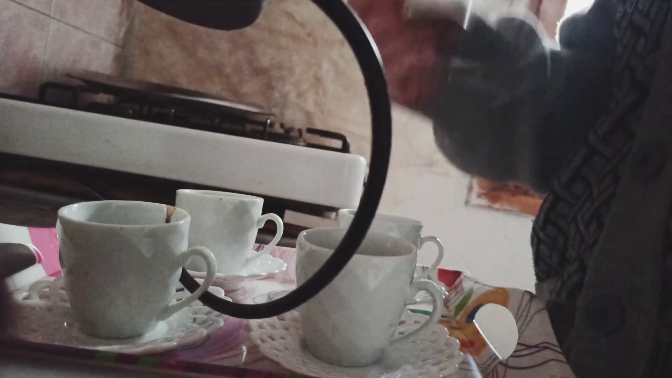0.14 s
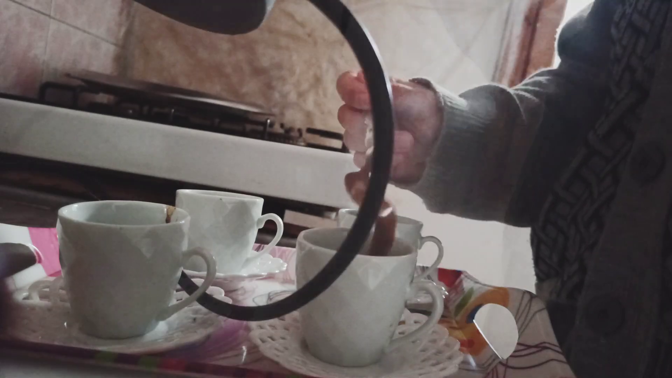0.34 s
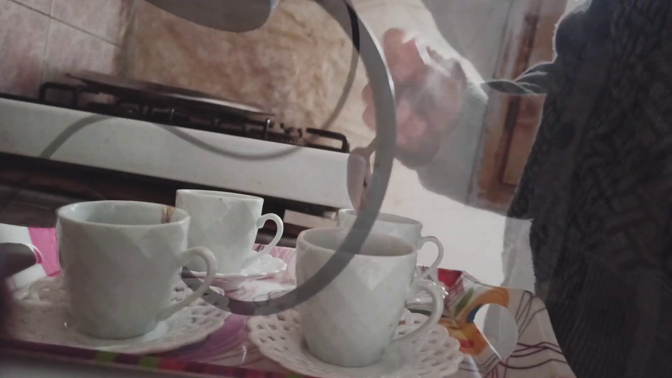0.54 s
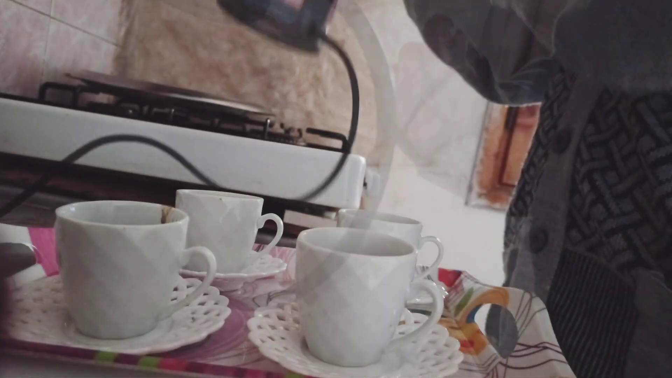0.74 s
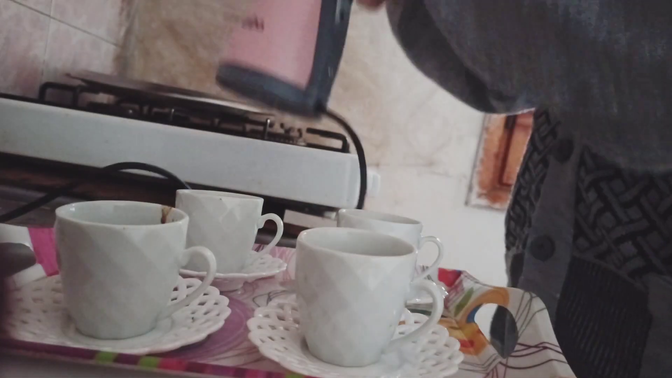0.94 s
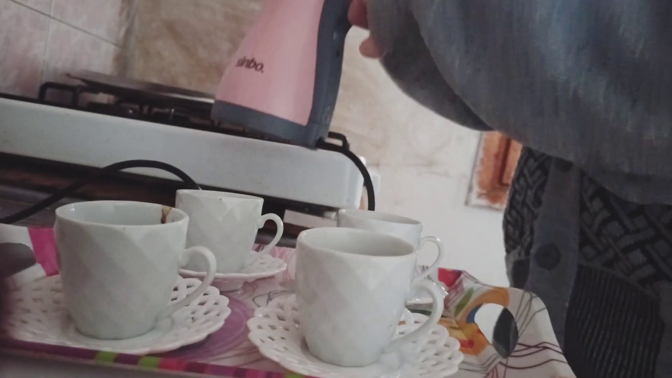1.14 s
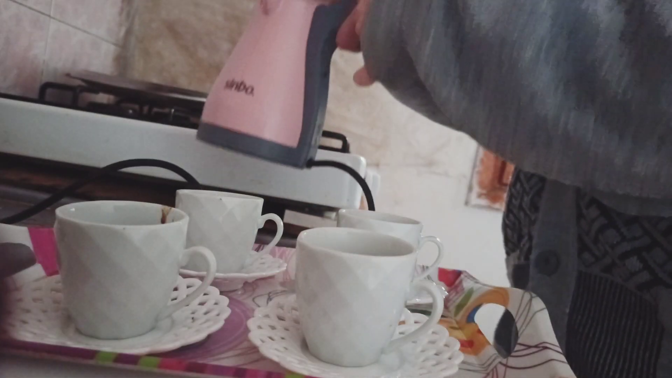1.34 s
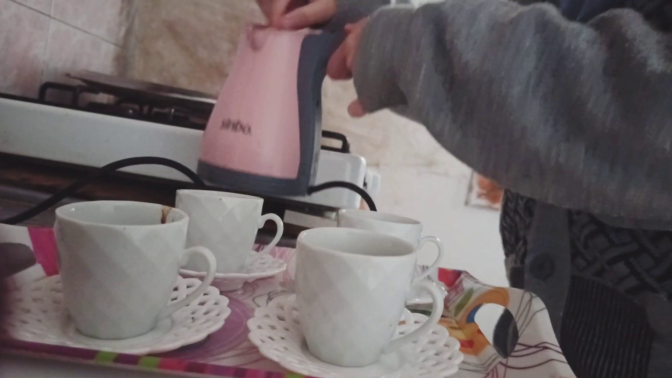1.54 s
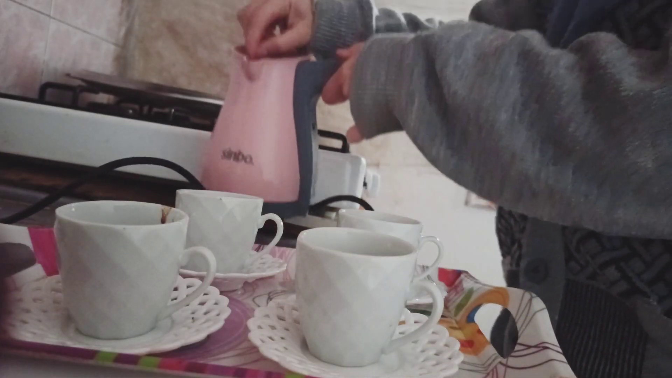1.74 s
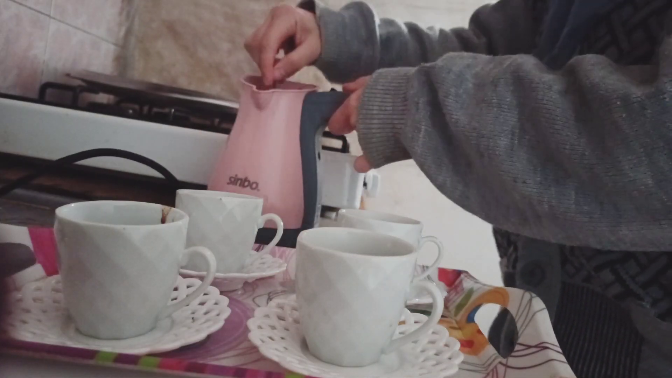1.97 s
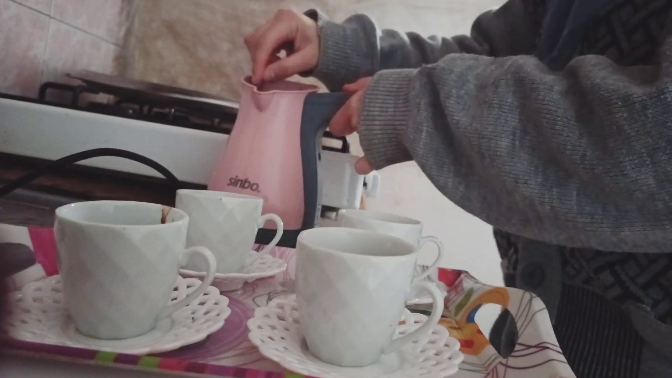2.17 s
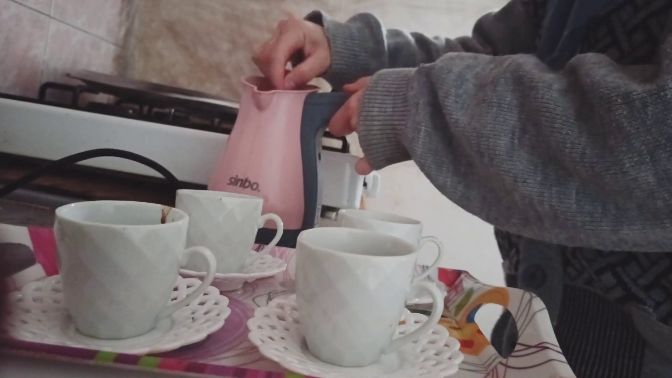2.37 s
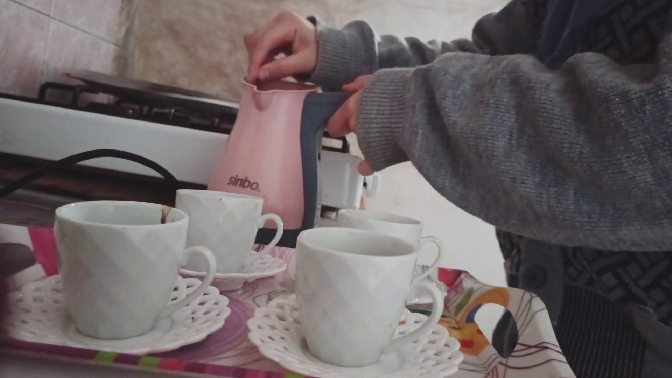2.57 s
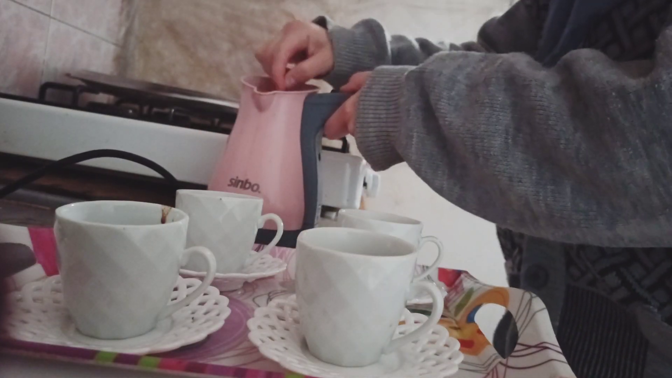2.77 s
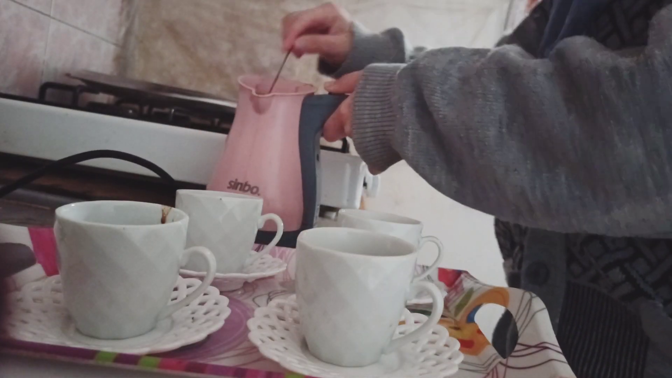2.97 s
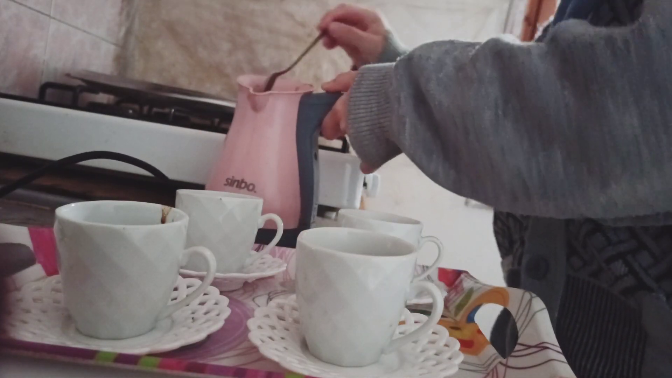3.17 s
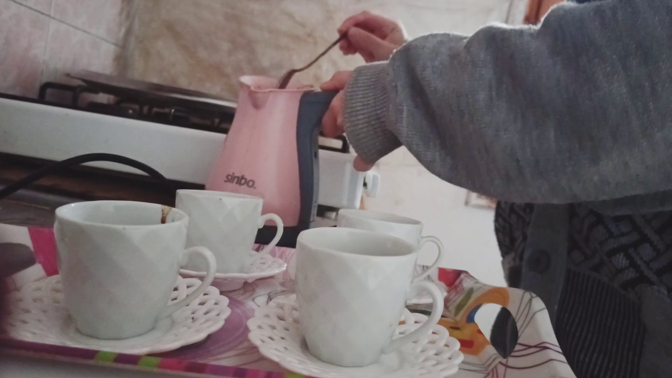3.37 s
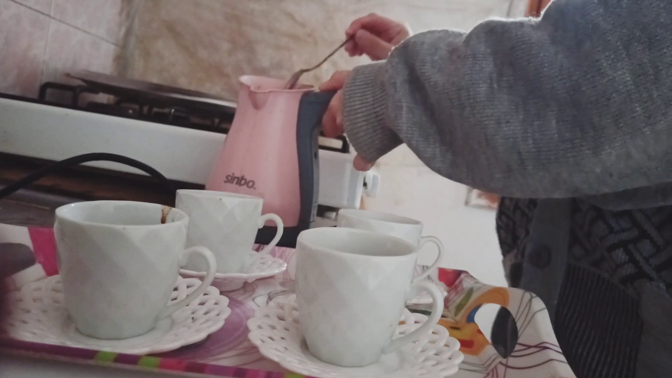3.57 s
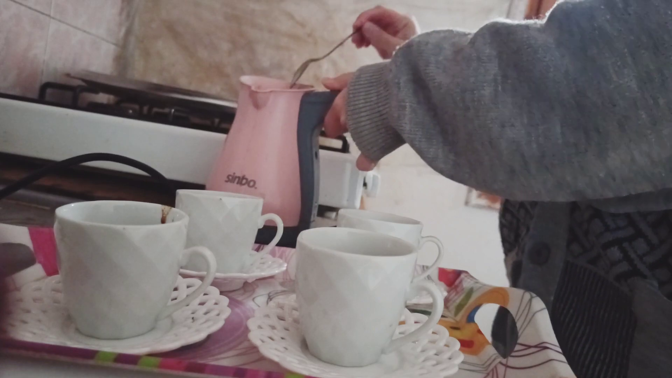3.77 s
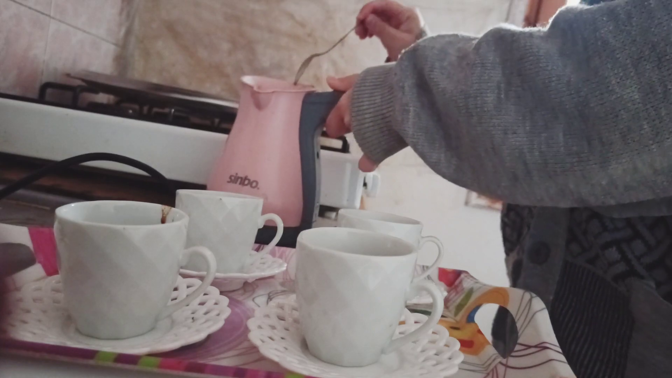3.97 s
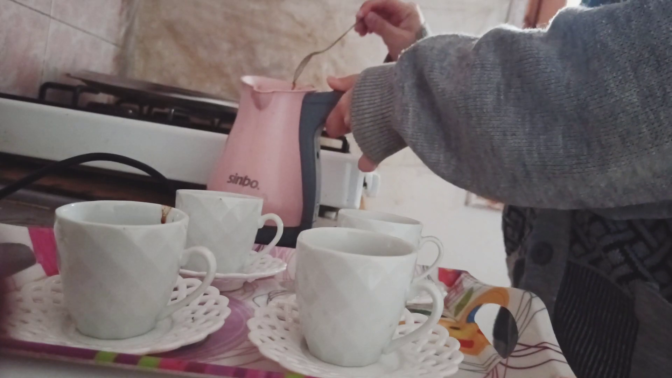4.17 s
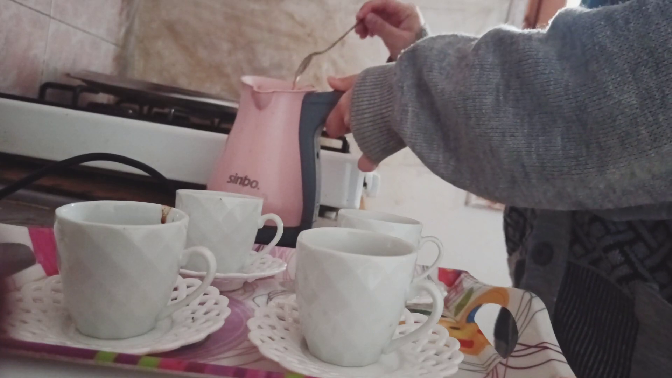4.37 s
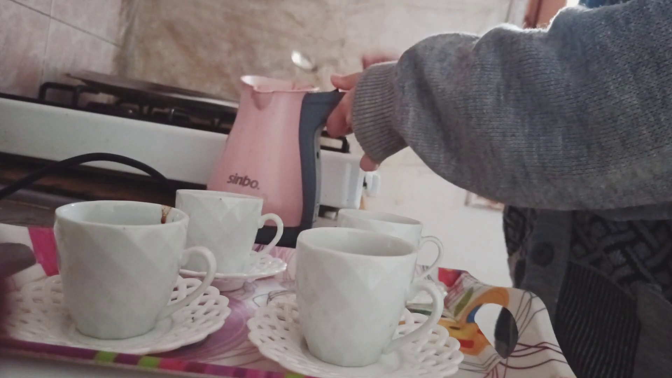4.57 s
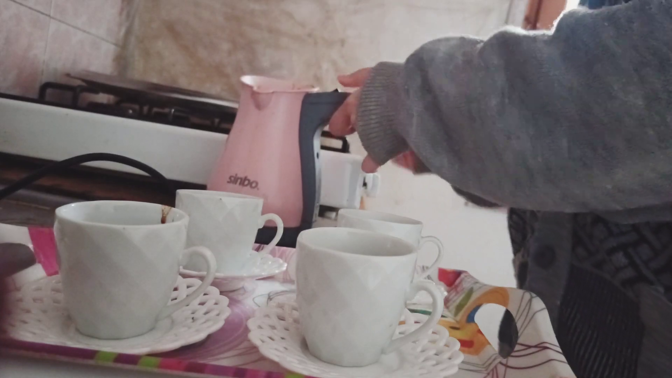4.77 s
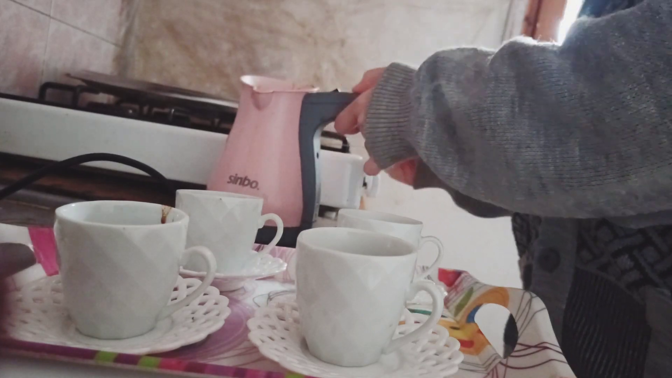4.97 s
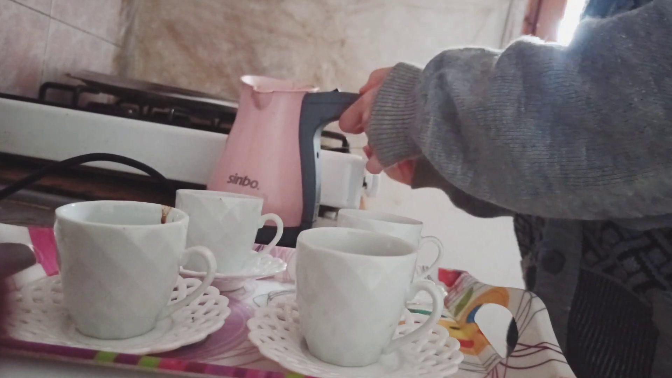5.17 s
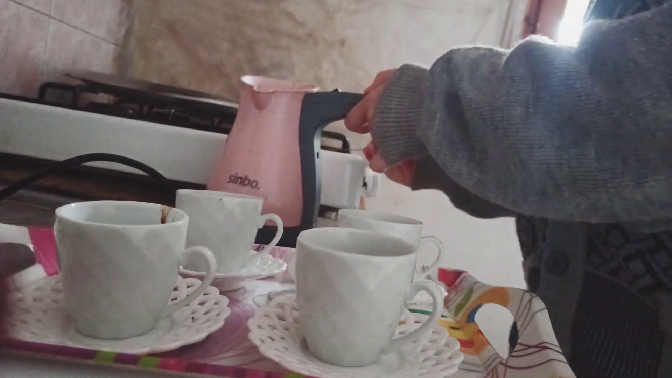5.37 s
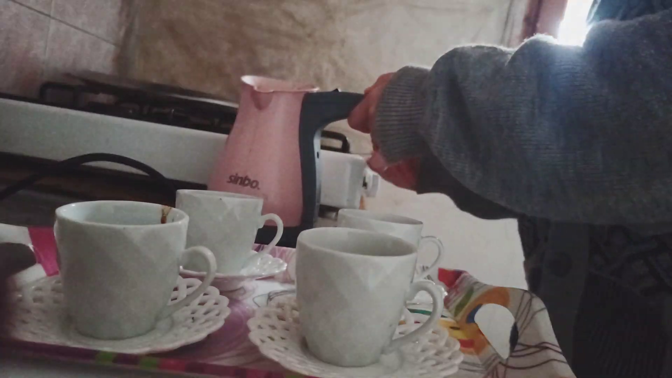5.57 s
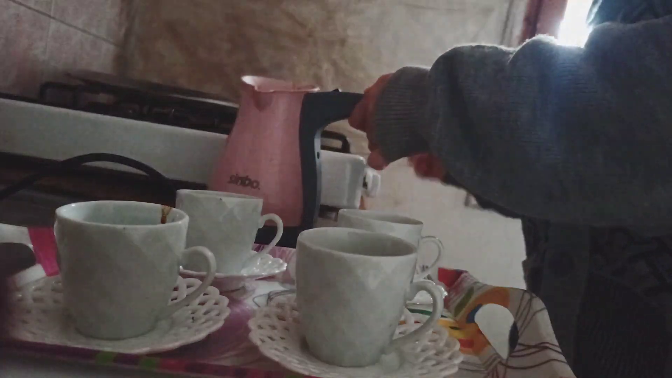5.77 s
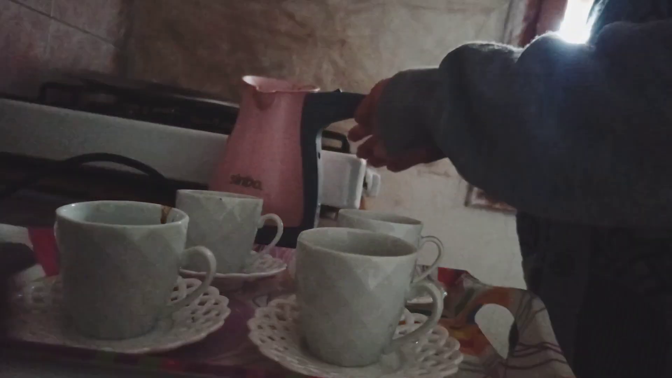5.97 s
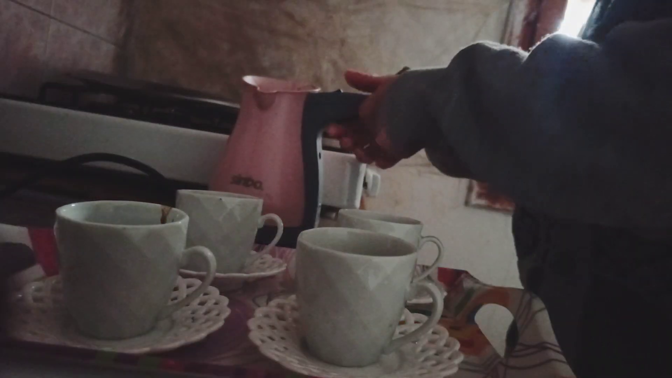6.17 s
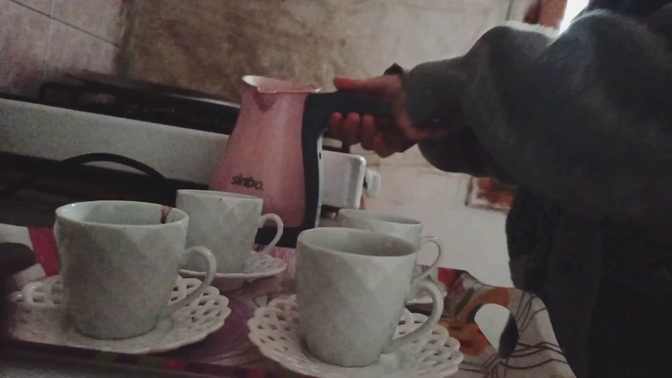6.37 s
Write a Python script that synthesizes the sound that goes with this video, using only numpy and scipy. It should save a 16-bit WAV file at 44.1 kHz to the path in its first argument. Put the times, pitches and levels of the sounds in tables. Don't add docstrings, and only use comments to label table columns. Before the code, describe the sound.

A spoon taps and stirs in a plastic coffee pot, which thuds down on the counter; later shelf knocks and a brief cutlery scrape.

```python
import sys
import numpy as np
from scipy import signal
from scipy.fft import rfft, irfft, next_fast_len
from scipy.io import wavfile
from scipy.ndimage import uniform_filter1d

SR = 44100
rng = np.random.default_rng(int(sys.argv[2]) if len(sys.argv) > 2 else 0)


def linear_from_db(decibels):
    return 10 ** (np.asarray(decibels, float) / 20)


def materialize(psi):
    bounded = np.clip(np.atleast_2d(psi).T, -1, 1)
    quanta = np.round(bounded * 32767).astype(np.int16)
    wavfile.write(sys.argv[1], SR, quanta)


N = 283122
TIME_S = np.arange(N) / SR
BINS_HZ = np.arange(257) * SR / 512

# start_s [s], peak_db [dB], thud_db [dB], clack_db near 1.7 kHz [dB], hardness_db [dB]
SPOON_BLOWS = [(0.4, -51.5, -13, 4, 15), (0.967, -38.5, 11, -4, -11), (1.113, -24.5, 1, -1.5, 7),
               (1.124, -31, 9, -4, -9), (1.409, -19.5, -8, -9.5, -2), (1.58, -15, -15, -5.5, -1.5),
               (1.812, -34.5, -3.5, 0, 0.5), (1.902, -39.5, 16.5, -2, 23), (2.111, -31, -14, -3, -10.5),
               (2.295, -21.5, 2, 0.5, 1), (2.417, -19, 6.5, 8, 17), (2.47, -33.5, -9, -6.5, 0),
               (2.699, -42.5, 1.5, -1, -4), (2.719, -38, 13, 12.5, 3.5), (2.8, -41, 6, -6.5, -7),
               (2.864, -40, -11, -8, -3), (3.328, -33.5, 2, 7, 6), (3.479, -30.5, 12, 20, 39.5),
               (3.573, -34.5, 18, -0.5, -9), (3.708, -44, 9, -5, -8.5), (3.349, -40, 9, -1, -5)]
SET_DOWN_BLOWS = [
    (1.951, 0, -1.5, 1.5, 6),
    (1.972, -14, -1.5, -3.5, -7.5),
    (1.996, -13.5, 14.5, -12.5, -4),
]
KNOCK_BLOWS = [
    (5.16, -19, -2.5, 3.5, 9.5),
    (5.209, -33, -7.5, -10, -3),
    (5.391, -15.5, 3.5, 1, -0.5),
    (5.444, -26.5, 8, -1, -6),
]
# pitch_hz [Hz], level_db [dB], t60_s [s]
POT_MODES = [(430, -14, 0.017), (533.2, 9, 0.027), (668, 8.5, 0.016), (879, 5.5, 0.049),
             (1211, -17.5, 0.058), (1506, 3, 0.06), (1670, -15.5, .06), (2170, -12.5, 0.12),
             (2290, -17.5, 0.15), (3400, -17.5, 0.042), (4070, -19.5, .04), (4950, -19, .05),
             (6750, -27, .04), (7610, -22, 0.017)]
COUNTER_MODES = [(118, -4.5, 0.2), (179, -11.5, 0.078), (256, -2, 0.22), (304.8, -1.5, 0.16),
                 (414, -0.5, 0.2), (539, 5, .35), (610, -0.5, .3), (730, -16, .2), (916, -5, .2),
                 (1180, -26.5, .1), (1485, -5, .2), (1730, -7.5, .15), (1990, -15, .2), (3230, -14, .3),
                 (3770, -23.5, .2), (6450, -28.5, .2), (7400, -35.5, .2)]
SHELF_MODES = [(246, -10.5, 0.49), (483, 7, 0.091), (740, 1, 0.12), (812, 7, 0.428), (1390, -5.5, 0.6),
               (1600, -1, 0.37), (2060, -13, 0.6), (2530, -3, 0.24), (2370, -27, 0.45), (3110, -13, 0.07),
               (3250, -9, 0.28), (4400, -19.5, 0.25), (4230, -16, 0.4), (6200, -16, 0.39)]
# start_s [s], peak_db [dB], first_pitch_hz [Hz], t60_s [s]
BUBBLES = [
    (1.642, -22, 559.5, 0.073),
    (1.746, -38, 566, 0.089),
    (1.849, -41.5, 563, .08),
    (3.615, -49.5, 601, 0.1),
    (3.715, -47, 660, 0.095),
]
# peak_s [s], level_db [dB]
AIR_PUFFS = [
    (1.35, -49.5),
    (1.385, -44.5),
    (1.69, -49.5),
    (1.87, -52),
]
# time_s [s], pitch_hz [Hz]
AIR_PITCH = [
    (1.35, 485),
    (1.45, 540),
    (1.72, 620),
]
# pitch_hz [Hz], width_hz [Hz], level_db [dB]
CUTLERY_MODES = [(1763, 29, -1), (1880, 10, -27), (2220, 110, -7.5), (2510, 23, -14), (2920, 23, -5.5),
                 (3540, 18, -7), (4110, 34, 1.5), (4563, 69, -4.5), (4800, 18, -16), (5450, 130, 1),
                 (5230, 74, 3), (5600, 32, -5), (6230, 29, -22), (6370, 24, -9), (6930, 110, -2.5),
                 (7290, 27, 6.5), (7540, 46, 7), (7930, 23, -20), (8300, 24, 6)]
TINE_MODES = [(11700, 33, 0), (12000, 28, -18), (12400, 29, -12), (13300, 28, -20), (14000, 31, -22),
              (14200, 27, -17), (14700, 55, -21)]
# peak_s [s], level_db [dB]
RUSTLES = [
    (2.94, -58),
    (3.55, -66),
    (4.2, -81.5),
    (6.41, -57),
]
# peak_s [s], pitch_hz [Hz], level_db [dB], rise_db_s [dB/s], steadiness [0-1]
SHEET_TONES = [
    (0.01, 865, -65.5, 305, 0.8),
    (3.121, 902, -67, 43, 0.3),
    (5.78, 966, -64.5, 300, 1),
]
# pitch_hz [Hz], level_db [dB per Hz]
HUM_SPECTRUM = [(24, -75.5), (40, -61.5), (86, -13.5), (113, -3.5), (275, -7.5), (301, -0.5), (329, -3.5),
                (452, -2), (580, -11), (853, -10), (1050, -16.5), (4700, -22.5), (5000, -30.5),
                (7340, -26.5), (9000, -42.5), (11700, -84), (19800, -120)]
# time_s [s], level_db [dB]
HUM_SWELL = [(0, -58), (.6, -65.5), (1.3, -59.5), (1.62, -61.5), (2.04, -57.5), (2.3, -58.5), (3.75, -58),
             (4.2, -60), (5.36, -60), (5.6, -52.5), (5.8, -59.5), (6.42, -59.5)]
# pitch_hz [Hz], likeness [0-1]
PORT_LIKENESS = [(60, 0.22), (130, 0.76), (290, 0.9), (640, 0.031), (1400, -0.012), (3000, -0.76),
                 (7000, 0.66)]
# pitch_hz [Hz], t60_s [s]
ROOM_DECAY = [(100, 0.5), (260, 0.44), (700, .36), (1840, 0.3), (4850, 0.24), (9000, 0.19)]
# pitch_hz [Hz], level_db [dB]
MIC_RESPONSE = [(60, -49.5), (100, -12.5), (200, -4.5), (4600, 4.5), (5000, -6.5), (5800, -8), (6300, 0),
                (7600, -7), (8400, -21.5), (11000, -22), (15000, -31)]
# pitch_hz [Hz], difference_db [dB]
LEFT_OVER_RIGHT = [(60, 1.5), (200, 1.5), (600, 6), (2500, 1), (5000, 7.5), (9000, 9), (12000, 0.6)]

EDGE_HZ, AIR_HZ = 8750, 11500
EDGE_SHARE = 0.43
DRAG_S, DRAG_DB, SLIDE_S = 5.592, -38, 0.1
BITE_DB_S, SLIDE_DB_S, LIFT_DB_S = 2501, 40, 220
SHINE_DB, SHINE_RISE_DB_S, SHINE_FALL_DB_S = 8, 1160, 53


def strike(blows, body, ring, clatter_db, clatter_s, contact_s, bounce_s, bounce_db, bounce_over_db):
    out = np.zeros((2, N + SR))
    t = np.arange(8192) / SR
    hz, db, t60 = np.transpose(body)[:, :, None]
    t60 = np.minimum(ring * t60, 28 / hz)
    bounces = [(s + bounce_s, peak_db + bounce_db, *tone)
               for s, peak_db, *tone in blows if peak_db > bounce_over_db]
    for s, peak_db, thud, clack, hard in [*blows, *bounces]:
        weight, detune, phase = rng.standard_normal((3, len(body), 1))
        oscillation = np.sin(2 * np.pi * hz * (1 + 0.01 * detune) * t + 0.8 * phase)
        modes = (linear_from_db(db + 2 * weight) * oscillation * 1000. ** (-t / t60)).sum(0)
        clatter = shape(rng.standard_normal(len(t)), [(hz[0, 0] * 0.6, -30), *zip(hz[:, 0], db[:, 0])])
        clatter = linear_from_db(clatter_db) * unit(clatter) * np.exp(-t / clatter_s)
        sound = modes / np.abs(modes).max() + clatter
        sound *= 1 - np.exp(-t / contact_s)
        edge = clack + EDGE_SHARE * (hard - clack)
        colour = [(300, thud), (800, 0.0062), (1700, clack), (3200, edge),
                  (5500, hard), (8500, hard), (11000, hard - 25)]
        sound = np.roll(shape(np.roll(sound, 400), colour), -400)[:7600]
        sound = heard(linear_from_db(peak_db) * sound / np.abs(sound).max())
        start = int(s * SR)
        out[:, start:start + sound.shape[1]] += sound
    return out[:, :N]


def glugs():
    out = np.zeros(N)
    t = np.arange(8192) / SR
    for s, peak_db, hz, t60 in BUBBLES:
        pitch_hz = hz * (1 + 0.14 * (1 - np.exp(-t / 0.017)))
        envelope = (1 - np.exp(-t / 0.0029)) * 1000. ** (-t / t60)
        bubble = np.sin(2 * np.pi * np.cumsum(pitch_hz) / SR) * envelope
        start = int(s * SR)
        out[start:start + len(t)] += linear_from_db(peak_db) * bubble
    return out


def pot_air():
    pitch_hz = np.interp(TIME_S, *np.transpose(AIR_PITCH))
    level_db = swell(AIR_PUFFS, rise_db_s=450, fall_db_s=330) + 7.0
    return sing(pitch_hz, level_db, width_hz=73.0, steady=0.57)


def drag():
    rare_jerks = 1 + 3 * (rng.standard_normal(N) * 0 + rng.random(N) < 0.02)
    clicks = rng.standard_normal(N) * rare_jerks * linear_from_db(2 * walk(90))
    bite_db = swell([(DRAG_S, DRAG_DB)], BITE_DB_S, SLIDE_DB_S)
    rasp_db = bite_db + np.minimum(0, -LIFT_DB_S * (TIME_S - DRAG_S - SLIDE_S))
    shine_db = swell([(DRAG_S, SHINE_DB)], SHINE_RISE_DB_S, SHINE_FALL_DB_S)
    low = shape(clicks, [(150, -15.5), (300, 4.5), (500, 3), (850, 1.5), (1300, -3.5),
                         (2500, -24.0), (3000, -15), (9000, -85.5)])
    scrape = shape(clicks, [(1800, -24.0), (2500, -11.5), (7500, -7), (9000, 2), (11000, -55)])
    high = linear_from_db(-5.5) * unit(scrape)
    bins_hz = np.arange(N // 2 + 1) * SR / N
    for body, share_db in ((CUTLERY_MODES, -4), (TINE_MODES, -6)):
        modes = sum(linear_from_db(db) / (1 + (2 * (bins_hz - hz) / width) ** 2) for hz, width, db in body)
        high = high + linear_from_db(share_db) * unit(irfft(rfft(clicks) * modes, N))
    return unit(low) * linear_from_db(rasp_db) + high * linear_from_db(rasp_db + shine_db)


def swish():
    grains = rng.standard_normal(N) * linear_from_db(2.0 * walk(27))
    rustle = shape(grains, [(500, -34.0), (1500, 4), (4000, -0.5), (8000, 8.0), (11000, -24)])
    return unit(rustle) * linear_from_db(swell(RUSTLES, rise_db_s=69.5, fall_db_s=61) - 9.5)


def sheet():
    tones = np.zeros(N)
    for s, hz, db, rise_db_s, steady in SHEET_TONES:
        pitch_hz = hz - 45.13 * (TIME_S - s)
        level_db = swell([(s, db)], rise_db_s, fall_db_s=32)
        tones += sing(pitch_hz, level_db, width_hz=25., steady=steady)
    return tones


def sing(hz, db, width_hz, steady):
    carrier = np.exp(2j * np.pi * np.cumsum(hz) / SR)
    jolts = steady + (1 - steady) * (unit(walk(width_hz)) + 1j * unit(walk(width_hz)))
    return np.real(carrier * jolts) * linear_from_db(db + 1.5)


def heard(x):
    t = np.arange(100) * 256 / SR
    t60 = np.interp(BINS_HZ, *np.transpose(ROOM_DECAY))[:, None]
    tail = ports(1000. ** (-t / t60))
    tail += linear_from_db(-19.5) * ports(1000. ** (-t / 0.58) * np.ones((len(BINS_HZ), 1)))
    tail *= 1 - np.exp(-np.arange(tail.shape[1]) / SR / 0.0032)
    tail *= linear_from_db(-4.5) / np.sqrt(np.sum(tail ** 2) / 2)
    tail[[0, 1], [0, 4]] = linear_from_db(-1.0)
    return signal.fftconvolve(x[None], tail, axes=1)


def hum():
    centres_hz = 50 * 2 ** np.arange(0, 8, 0.5)
    swell_db = np.interp(TIME_S, *np.transpose(HUM_SWELL))[::256] + 65.5
    bands_db = np.array([np.clip(1200 / hz, 0.2, 1) * swell_db + 2.4 * walk(4.433)[::256]
                         for hz in centres_hz])
    nearest = np.abs(BINS_HZ[:, None] - centres_hz).argmin(axis=1)
    gain = linear_from_db(np.pad(bands_db, ((0, 0), (0, 2)), "edge")[nearest])
    return unit(shape(ports(gain)[:, :N], HUM_SPECTRUM)) * linear_from_db(-59.5)


def ports(gain):
    noise = rng.standard_normal((3, *gain.shape)) + 1j * rng.standard_normal((3, *gain.shape))
    alike = np.clip(np.interp(BINS_HZ, *np.transpose(PORT_LIKENESS)), 0, 1)[:, None]
    pair = np.sqrt(alike) * noise[0] + np.sqrt(1 - alike) * noise[1:]
    return signal.istft(gain * pair, nperseg=512)[1]


def sides(pair):
    return np.array([shape(x, [(hz, sign * db / 2) for hz, db in LEFT_OVER_RIGHT])
                     for x, sign in zip(pair, (1, -1))])


def shape(x, points):
    size = next_fast_len(x.shape[-1])
    hz, db = np.transpose(points)
    bins_hz = np.arange(size // 2 + 1) * SR / size
    gain = linear_from_db(np.interp(np.log(bins_hz + 1), np.log(hz), db))
    return irfft(rfft(x, size) * gain, size)[..., :x.shape[-1]]


def unit(x):
    return x / np.sqrt(np.mean(x ** 2))


def walk(rate_hz):
    k = int(SR / rate_hz)
    held = np.repeat(rng.standard_normal(N // k + 1), k)
    return uniform_filter1d(uniform_filter1d(held, k), k)[:N]


def swell(rows, rise_db_s, fall_db_s):
    s, db = np.transpose(rows)[:, :, None]
    t = TIME_S - s
    return np.max(db + np.minimum(rise_db_s * t, -fall_db_s * t), axis=0)


def scene():
    firm_db = -22.5
    near = strike(SPOON_BLOWS, POT_MODES, 0.46, clatter_db=-11.5, clatter_s=0.0057, contact_s=0.00085,
                  bounce_s=0.022, bounce_db=-14.5, bounce_over_db=firm_db)
    near += strike(SET_DOWN_BLOWS, COUNTER_MODES, 0.25, clatter_db=-10.5, clatter_s=0.0024, contact_s=0.0021,
                   bounce_s=0.011, bounce_db=-12.5, bounce_over_db=firm_db / 4)
    near += strike(KNOCK_BLOWS, SHELF_MODES, 0.085, clatter_db=-10.5, clatter_s=0.015, contact_s=0.001,
                   bounce_s=0.021, bounce_db=-10.5, bounce_over_db=firm_db)
    near += heard(drag() + swish() + pot_air() + glugs())[:, :N]
    near += sheet()
    return sides(shape(near, MIC_RESPONSE) + hum())


def low_pass(x):
    return signal.sosfilt(signal.butter(12, 15610, fs=SR, output="sos"), x)


def record(dry):
    dry = np.tanh(dry / 0.95) * 0.95
    high_passed = dry - uniform_filter1d(dry, size=900)
    kept = shape(high_passed, [(EDGE_HZ * 0.98, 0), (EDGE_HZ * 1.02, -60), (AIR_HZ * 0.99, -60), (AIR_HZ, 0)])
    hiss = shape(rng.standard_normal(dry.shape), [(8000, -9), (AIR_HZ * 0.68, -9), (AIR_HZ, 0)])
    return low_pass(kept + linear_from_db(-88.5) * hiss)


dry = scene()
out = record(dry)
materialize(out)
```